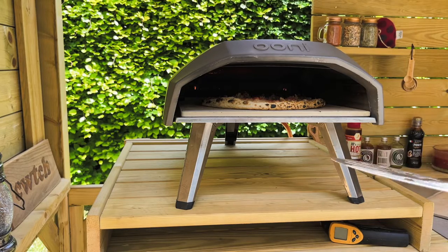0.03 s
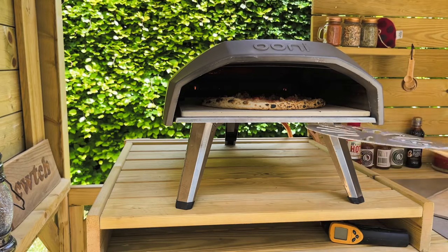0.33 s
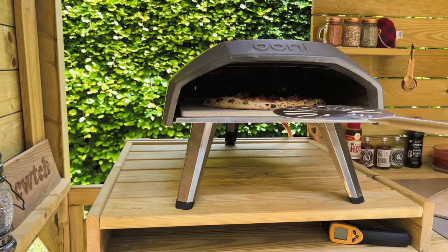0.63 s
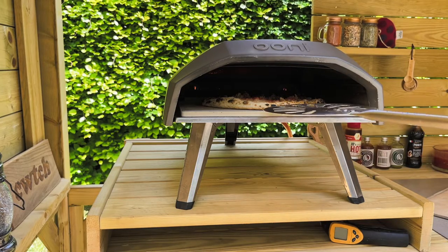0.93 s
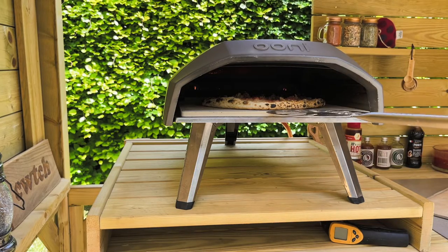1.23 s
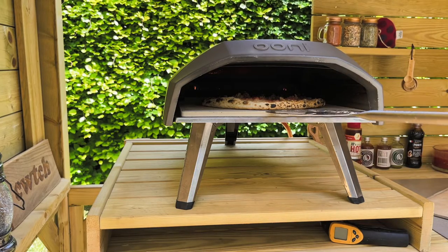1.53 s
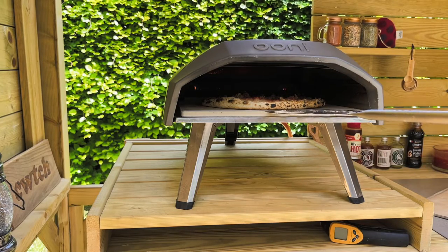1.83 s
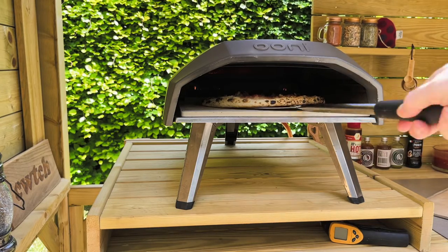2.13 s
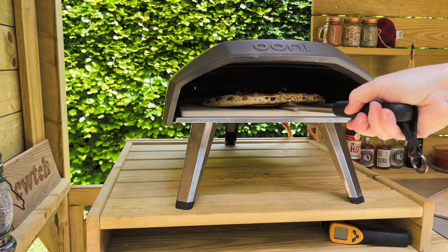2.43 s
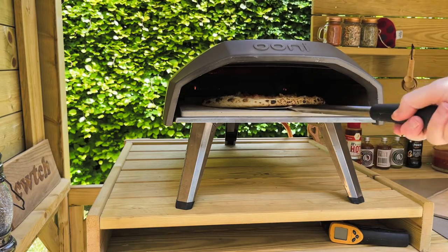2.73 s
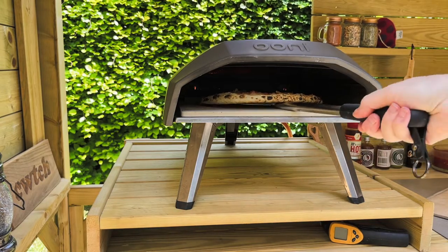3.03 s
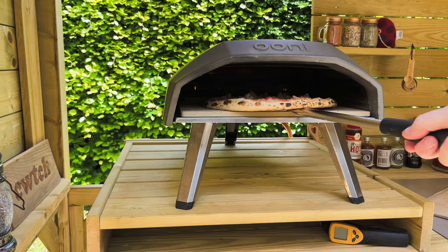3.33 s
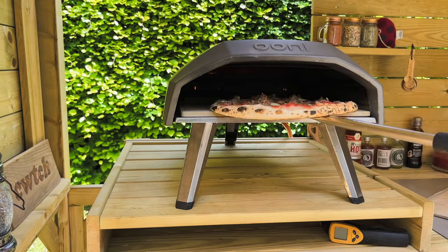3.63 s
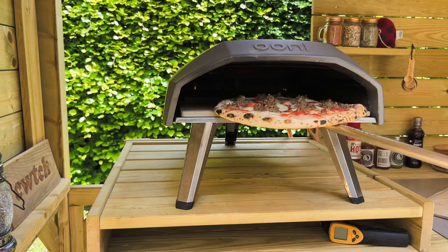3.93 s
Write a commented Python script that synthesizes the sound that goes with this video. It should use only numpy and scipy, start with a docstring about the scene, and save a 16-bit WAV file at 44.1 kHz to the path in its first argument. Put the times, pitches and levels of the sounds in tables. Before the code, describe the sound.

A metal peel rasps and clanks under a pizza in a small outdoor gas oven. The burner's low rumble and hiss come first, with faint sizzling ticks, then the blade slides over the stone, knocking and squeaking thinly.

```python
"""A thin metal peel slides under a pizza in a small outdoor gas oven, shuffles and draws out again.
Grit on the stone floor rasps and rings the blade, which also clinks and squeaks. Each knock is a
crack, a metal clank and a swell from the hollow of the oven, with a short tail from a wooden shelter.
Underneath, the burner rumbles and hisses, with a few sizzling ticks and soft low thuds."""
import sys
import numpy as np
from scipy import signal
from scipy.fft import rfft, irfft, next_fast_len
from scipy.io import wavfile
from scipy.ndimage import uniform_filter1d

SR = 44100
rng = np.random.default_rng(int(sys.argv[2]) if len(sys.argv) > 2 else 0)


def unload_audio(sound):
    """Save the sound as a 16-bit wav file, at the path given as the first command line argument."""
    columns = np.transpose(np.atleast_2d(sound))
    # keep every value between -1 and 1, then stretch to whole-number steps
    steps = np.round(np.clip(columns, -1, 1) * 32767)
    wavfile.write(sys.argv[1], SR, steps.astype(np.int16))


N = 176400
T = np.arange(N) / SR

# EQ on the flame noise, with a dip near 12.5 kHz. Each row: frequency in Hz, level in dB.
FLAME_EQ = [(20, -30.5), (45, 0.5), (70, 4), (130, -2), (250, -4.5), (450, -14), (800, -17.5), (1400, -26),
            (4700, -26), (6300, -32.5), (8500, -25.5), (12500, -33.5), (15500, -32.5)]
# Fader ride on the burner's hiss. Each row: time in seconds, gain in dB.
HISS_RIDE = [(0, -1.5), (.55, -1), (1.0, -2), (1.4, 3), (1.8, 1), (4, 3.5)]
# Soft thuds. Each row: start in seconds, pitch in Hz, level in dB, t60 in seconds.
THUD_CUES = [(0.215, 56.3, -23.5, 0.36), (0.302, 47.6, -29.5, 0.11), (0.486, 113, -36, 0.34),
             (2.399, 59.8, -37, 0.61)]
# Sizzling ticks. Each row: start in seconds, level in dB.
SIZZLE_CUES = [(.465, -41), (0.546, -40.5), (.6, -38.5), (1.323, -36), (1.517, -41), (2.449, -39),
               (3.557, -24)]
# Notes of the oven's hollow. Each row: pitch in Hz, level in dB, rise and t60 in seconds.
HOLLOW_MODES = [(144, -18, 0.008, 0.29), (314.9, 2, 0.028, 0.118), (379.6, -16.5, 0.07, 0.12),
                (467.6, -3.5, 0.0031, 0.25), (489, -1, 0.0057, 0.17), (547.5, -6.5, 0.0059, 0.13)]
# Notes of the blade and shaft. Each row: pitch in Hz, level in dB, t60 in seconds.
BLADE_MODES = [(861, -7.5, 0.23), (963.95, 2, 0.068), (1192, -1, 0.073), (1260, -4.5, 0.0575),
               (1424, -8.5, 0.25), (1850, -10.5, 0.27), (1977, 4, 0.095), (2169, -1.5, 0.057),
               (2440, -30, 0.04), (2644, -5.5, 0.13), (2900, -6, 0.1916), (3240, -34, 0.064)]
# Blade resonances. Each row: peak time and half length in seconds, pitch in Hz, level in dB,
# width over pitch.
RESONANCE_CUES = [(1.175, 0.024, 1150, -44.5, 0.043), (2.159, 0.22, 3120, -38, 0.29),
                  (2.748, .05, 2884, -35.5, 0.053), (3.214, .08, 1110, -34, 0.68),
                  (3.25, .08, 4400, -43, 0.027), (3.766, .041, 2890, -40, 0.039)]
# Strokes on the stone. Each row: peak time, rise and fall in seconds, steepness of the swell,
# then low, middle and treble levels in dB.
STROKE_CUES = [(2.19, 0.33, 0.19, 1.08, -34.5, -24.5, -14.5), (2.221, 0.028, 0.033, 0.85, -29, -16, -17),
               (2.711, 0.16, 0.089, 0.38, -33, -30.5, -26.5), (2.921, 0.13, 0.071, 1.37, -29.5, -24, -21),
               (3.03, 0.094, 0.047, 0.55, -35, -38, -31.5), (3.212, 0.19, 0.17, 2.24, -27, -32.5, -30),
               (3.299, 0.18, 0.04, 0.77, -32, -32, -25), (3.499, 0.0407, 0.067, 2.4, -24, -22, -20),
               (3.596, 0.083, 0.078, 1.67, -24.5, -25.5, -24.5),
               (3.673, 0.0048, 0.071, 1.43, -30, -29.5, -23),
               (3.734, 0.0079, 0.055, 1.4, -34.5, -32.5, -22), (3.85, 0.18, 0.16, 1.36, -31, -38.5, -34.5)]
# Knocks. Each row: start in seconds, hollow level in dB, trim on its main low note in dB,
# blade level in dB, blade's ring centre in Hz, crack level in dB.
KNOCK_CUES = [(1.107, -37.5, 0.5, -43, 1910, -40.5), (1.160, -48, 2.5, -43, 1140, -48),
              (2.251, -19, -9.5, -15.5, 1850, -52.5), (2.324, -23, -0.5, -25.5, 2280, -58),
              (2.563, -27, -8.5, -34.5, 2060, -62), (2.651, -29, -38, -26.5, 2000, -65),
              (2.845, -21.5, -6, -23, 1950, -40), (2.917, -18.5, -4, -20.5, 2107, -28.5),
              (3.385, -20.5, -2.5, -13, 2800, -26.5), (3.426, -15, -6, -14.5, 2200, -23.5),
              (3.471, -17.5, -8.5, -22, 970, -31), (3.499, -20, 0, -27, 1430, -35),
              (3.595, -25, -7, -30.5, 1330, -34)]
# EQ on the grit noise, with a dip near 12.5 kHz. Each row: frequency in Hz, level in dB.
GRIT_EQ = [(100, -3), (250, 7), (500, 4.5), (900, 8), (2500, 4.5), (4200, -3), (6300, -7), (10000, -16.5),
           (12500, -20.5), (15500, -13)]
# EQ on the clank and the crack. Each row: frequency in Hz, level in dB.
CLANK_EQ = [(100, -16), (300, 8.5), (600, 2.5), (1000, 7.5), (2200, 3.5), (3100, -5.5), (4000, -6),
            (6000, -4), (15000, -65)]
CRACK_EQ = [(300, 3.5), (2000, -17.5), (4500, -0.5), (10000, -2.5), (16000, -22)]
# Stereo lean. Each row: frequency in Hz, left minus right in dB.
STEREO_LEAN = [(60, 0.5), (380, -4.5), (700, 1), (1290, -3), (2400, 2), (8000, 0)]
# Stereo phase. Each row: frequency in Hz, the left side's lead in radians.
STEREO_PHASE = [(900, 0), (1600, -.8), (2800, 0), (4300, -1.5), (6300, -3.1), (7300, -4.8), (9200, -6.3),
                (11000, -7.7), (12700, -9.4), (15600, -12.5)]


def undb(db):
    """Decibels to gain."""
    return 10 ** (np.asarray(db) / 20)


def unit(x):
    """Scale to rms 1."""
    return x / np.sqrt(np.mean(x ** 2))


def over_hz(points, size=N):
    """Join (Hz, value) points on a log-frequency axis."""
    hz, value = np.array(points, float).T
    return np.interp(np.log(np.fft.rfftfreq(size, 1 / SR) + 1), np.log(hz), value)


def colour(x, points):
    """EQ a sound with a (Hz, dB) curve."""
    size = next_fast_len(x.shape[-1])
    return irfft(rfft(x, size) * undb(over_hz(points, size)), size)[..., :x.shape[-1]]


def noise(width, size=N):
    """Stereo noise; width is side over mid."""
    mid, side = rng.standard_normal((2, size))
    return unit(np.array([mid + width * side, mid - width * side]))


def band(hz, share, size):
    """Nearly mono noise around one frequency; share is bandwidth over centre."""
    ratio = (np.fft.rfftfreq(size, 1 / SR) + 1) / hz
    return unit(irfft(rfft(noise(0.11, size)) / (1 + ((ratio - 1 / ratio) / share) ** 2), size))


def wander(per_s):
    """A smooth random drift around zero."""
    hold = int(SR / per_s)
    steps = np.repeat(rng.standard_normal(N // hold + 1), hold)
    return 0.84 * uniform_filter1d(uniform_filter1d(steps, hold), hold)[:N]


def fade(t, t60):
    """Exponential decay, 60 dB down after t60 seconds."""
    return np.exp(-np.log(1000) * t / t60)


def hit(t, rise, t60):
    """A rounded attack into a decay, peak 1."""
    shape = (1 - np.exp(-(t / rise) ** 2)) * fade(t, t60)
    return shape / shape.max()


def swell(rise, fall):
    """Straight rise to 1 and fall to 0."""
    return np.interp(T[:int((rise + fall) * SR)], [0, rise, rise + fall], [0, 1, 0])


def ring(x, response):
    """Play a sound through a response of unit energy."""
    response = response / np.sqrt(np.mean(np.sum(response ** 2, axis=-1)))
    return signal.fftconvolve(np.atleast_2d(x), np.atleast_2d(response), axes=-1)[:, :x.shape[-1]]


def add(out, start, sound):
    """Mix a sound in at a start time in seconds."""
    i = int(start * SR)
    out[:, i:i + sound.shape[1]] += sound[:, :N - i]


def piece(x, count):
    """A random stretch of a long noise."""
    i = rng.integers(N - count)
    return x[:, i:i + count]


def burner(level_db=-46, flicker_db=3.5, split_hz=900):
    """The gas flame is the bed: a flickering rumble, and a hiss that comes up after a second."""
    flame = unit(colour(noise(0.49), FLAME_EQ)) * undb(level_db + flicker_db * wander(per_s=20))
    hz = np.fft.rfftfreq(N, 1 / SR)
    rumble = irfft(rfft(flame) / (1 + (hz / split_hz) ** 4), N)
    hiss_gain = undb(np.interp(T, *np.array(HISS_RIDE).T))
    return rumble + (flame - rumble) * hiss_gain


def thuds(overtone=1.74, overtone_db=-3, rise_s=0.0059):
    """Two low modes that die quickly, like steps on wooden boards."""
    t, out = T[:SR // 2], np.zeros((2, N))
    for start, hz, db, t60 in THUD_CUES:
        boom = np.sin(2 * np.pi * hz * t) + undb(overtone_db) * np.sin(2 * np.pi * hz * overtone * t)
        add(out, start, undb(db) * (boom * hit(t, rise_s, t60))[None])
    return out


def sizzle():
    """Short bright spits from the hot pizza."""
    t, out = T[:SR // 20], np.zeros((2, N))
    for start, db in SIZZLE_CUES:
        add(out, start, undb(db) * noise(0.5, len(t)) * hit(t, rise=0.00024, t60=0.02))
    return out


def oven_ring(t, main_note_db=0, detune=0.018):
    """The oven's hollow blooms and dies away, tuned a little differently each time."""
    notes = []
    for hz, db, rise, t60 in HOLLOW_MODES:
        pitch = hz * (1 + detune * rng.standard_normal())
        notes.append(undb(db) * hit(t, rise, t60) * np.sin(2 * np.pi * pitch * t))
    notes[1] *= undb(main_note_db)
    return sum(notes)


def blade_ring(t, spread_db=3, stereo_radians=0.22):
    """The blade's clear modes, at random strengths as if touched in a new spot."""
    out = np.zeros((2, len(t)))
    for hz, db, t60 in BLADE_MODES:
        gain = undb(db + spread_db * rng.standard_normal())
        phase = 2 * np.pi * (hz * t + rng.random()) + stereo_radians * rng.standard_normal((2, 1))
        out += gain * fade(t, t60) * np.sin(phase)
    return out


def sheet_ring(t, low_hz=3000, high_hz=11000, count=220):
    """The many fine high modes that give thin sheet metal its sheen."""
    hz = np.geomspace(low_hz, high_hz, count) * (1 + 0.0201 * rng.standard_normal(count))
    return rng.standard_normal(count) @ np.sin(2 * np.pi * hz[:, None] * t) * fade(t, t60=0.06)


def bending_waves(x, delay_at_1khz_s=0.00202):
    """Low bending waves travel slowly along the peel, so a knock's lows land after its highs."""
    hz = np.fft.rfftfreq(x.shape[-1], 1 / SR)
    lag = 4 * np.pi * delay_at_1khz_s * np.sqrt(1000 * hz)
    return irfft(rfft(x) * np.exp(-1j * lag), x.shape[-1])


def blade_resonances():
    """The blade sings on the stone: a light tap's clink, thin squeaks and broad rasps in the strokes."""
    out = np.zeros((2, N))
    for peak, half, hz, db, share in RESONANCE_CUES:
        shape = swell(half, half)[:SR // 2]
        resonance = unit(band(hz, share, SR // 2)[:, :len(shape)])
        add(out, peak - half, undb(db) * resonance * shape)
    return out


def peel_scrapes(grains_per_s=5000, grain_spread_db=1, judder_db=4, bands_hz=(1100, 2800, 9000)):
    """Grit catches under the blade; each stroke touches elsewhere and rings other fine resonances."""
    t, brief, out = T[:SR // 5], T[:SR // 20], np.zeros((2, N))
    grains = (rng.random(N) < grains_per_s / SR) * rng.standard_normal(N)
    grains *= undb(grain_spread_db * rng.standard_normal(N))
    grit = unit(grains * undb(judder_db * wander(per_s=80)))
    rasp = unit(colour(grit, GRIT_EQ))
    hollow = undb(-21.5) * ring(grit, oven_ring(t))
    for peak, rise, fall, steepness, *levels_db in STROKE_CUES:
        pressure = swell(rise, fall) ** steepness
        span = (int((peak - rise) * SR) + np.arange(len(pressure))) % N
        smear = undb(5) * ring(rasp[span], noise(0.76, len(brief)) * fade(brief, t60=0.054))
        sheen = undb(-2) * ring(grit[span], sheet_ring(brief))
        blade = undb(3) * ring(grit[span], blade_ring(t))
        stroke = colour(unit(rasp[span] + smear + sheen + blade), list(zip(bands_hz, levels_db)))
        stroke += undb(levels_db[-1]) * hollow[:, span]  # the hollow follows the treble level
        add(out, peak - rise, stroke * pressure)
    return out


def peel_knocks(rise_s=0.0012, width=0.58):
    """The blade slaps the stone: a crack, a dense clank with a few clear modes, then the hollow."""
    t, out = T[:SR // 3], np.zeros((2, N))
    clank_noise = unit(colour(noise(width), CLANK_EQ))
    crack_noise = unit(colour(noise(width), CRACK_EQ))
    for start, hollow_db, main_note_db, blade_db, ring_hz, crack_db in KNOCK_CUES:
        clank = undb(-2) * piece(clank_noise, len(t)) * hit(t, rise_s, t60=0.18)
        ping = undb(-5) * band(ring_hz, 0.16, len(t)) * hit(t, rise_s, t60=0.087)
        modes = undb(2.5) * blade_ring(t) / np.sqrt(len(BLADE_MODES)) * np.minimum(t / rise_s, 1)
        blade = undb(blade_db) * bending_waves(clank + ping + modes)
        crack = undb(crack_db) * piece(crack_noise, len(t)) * hit(t, rise=0.00014, t60=0.17)
        hollow = undb(hollow_db) * oven_ring(t, main_note_db)
        add(out, start, crack + blade + hollow)
    return out


def scene(tail_db=-13.5):
    """The oven stands a little to the right, in a wooden shelter that adds a short tail."""
    t = T[:SR // 2]
    peel = peel_scrapes() + peel_knocks()
    shelter = rng.standard_normal((2, len(t))) * hit(t, rise=0.0037, t60=0.44)
    tail = undb(tail_db) * ring(peel, shelter)
    left, right = rfft(peel + tail + sizzle() + burner() + blade_resonances())
    lean = undb(over_hz(STEREO_LEAN) / 2)
    phase_turn = np.exp(1j * over_hz(STEREO_PHASE))
    return irfft(np.array([left * lean * phase_turn, right / lean]), N) + thuds()


def record(dry, top_hz=16000):
    """A steep low-pass takes the very top off the mix."""
    return signal.sosfilt(signal.ellip(8, .2, 70, top_hz, fs=SR, output="sos"), dry)


dry = scene()
out = record(dry)
unload_audio(out)
```